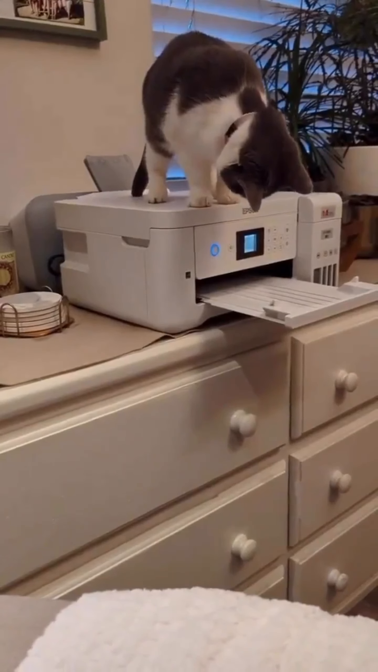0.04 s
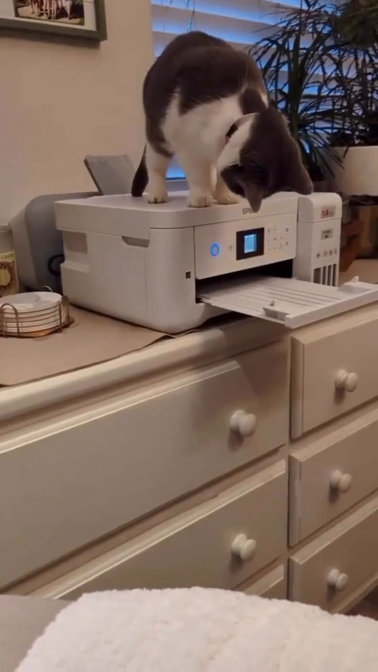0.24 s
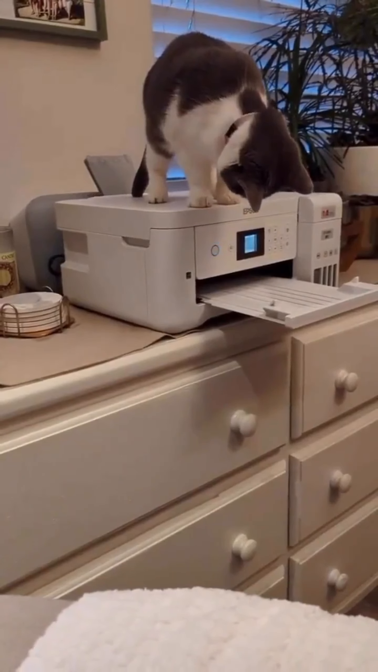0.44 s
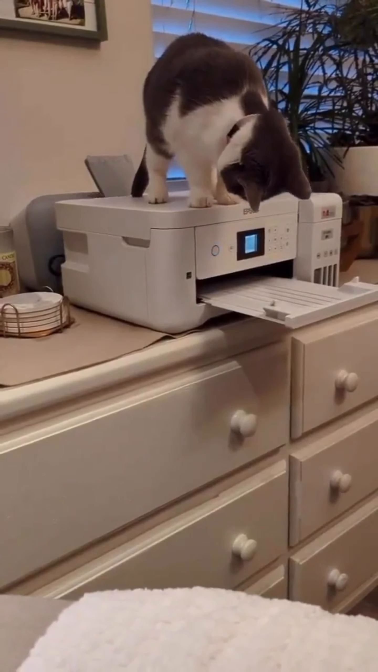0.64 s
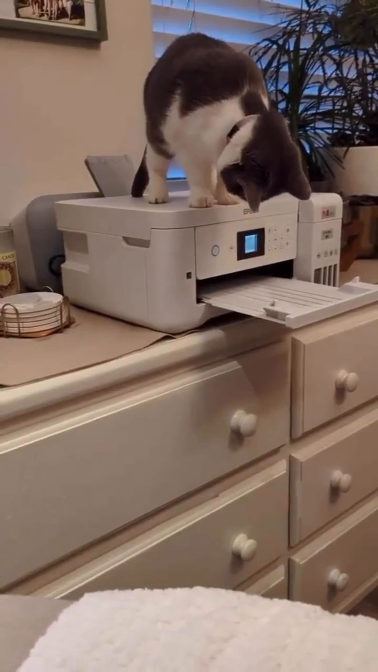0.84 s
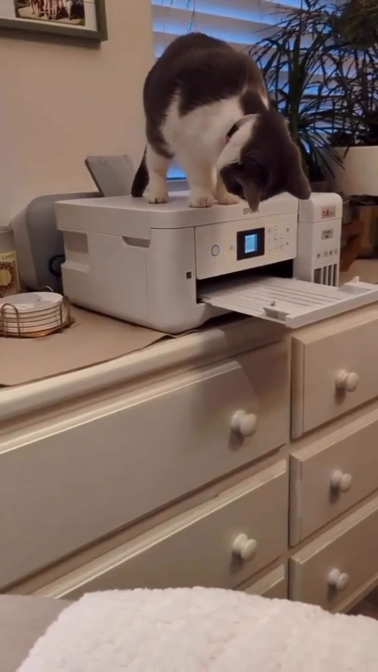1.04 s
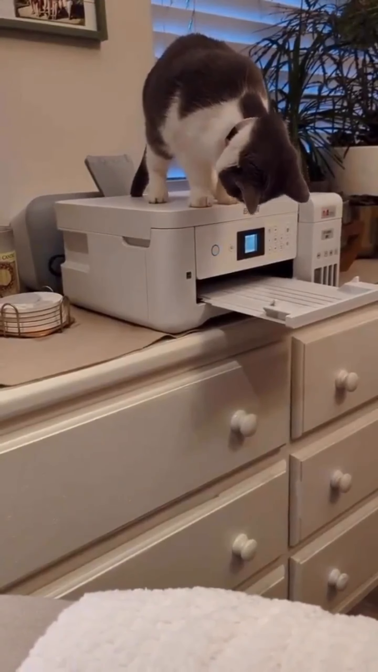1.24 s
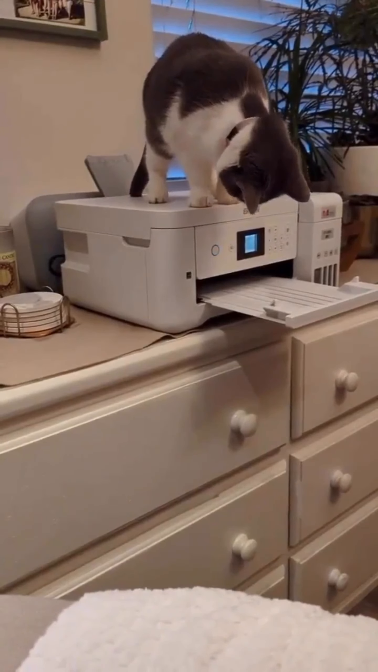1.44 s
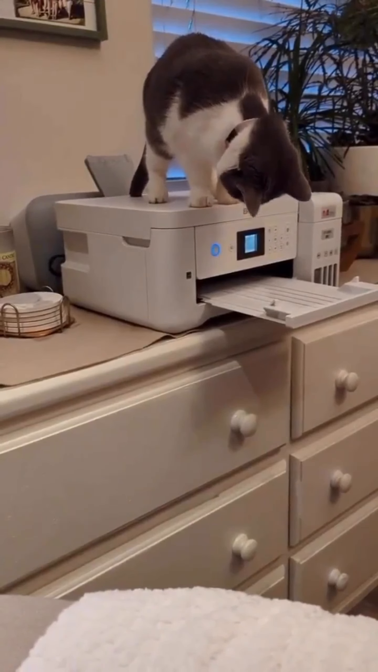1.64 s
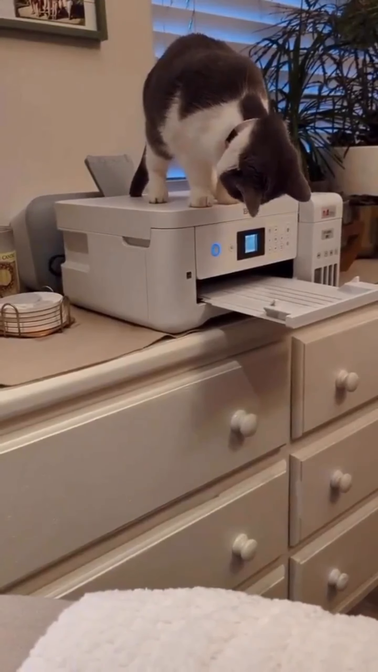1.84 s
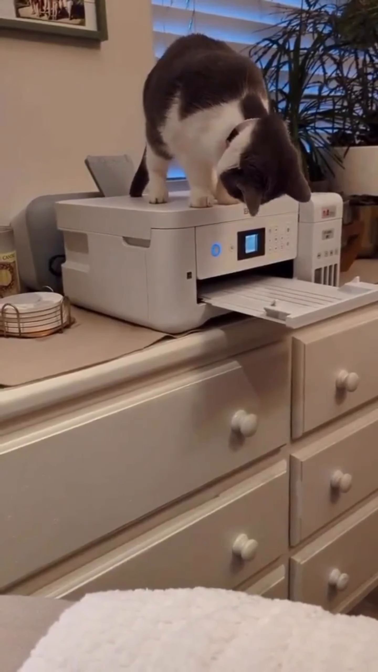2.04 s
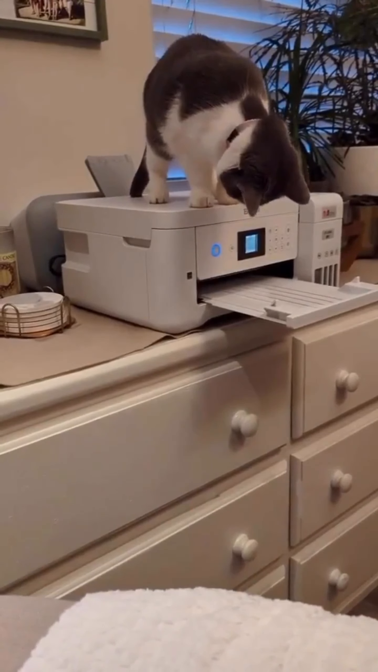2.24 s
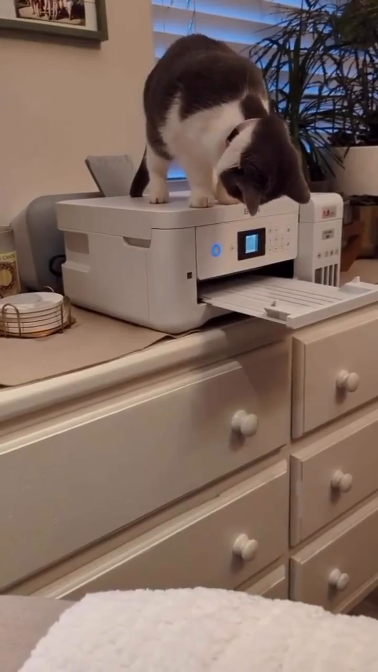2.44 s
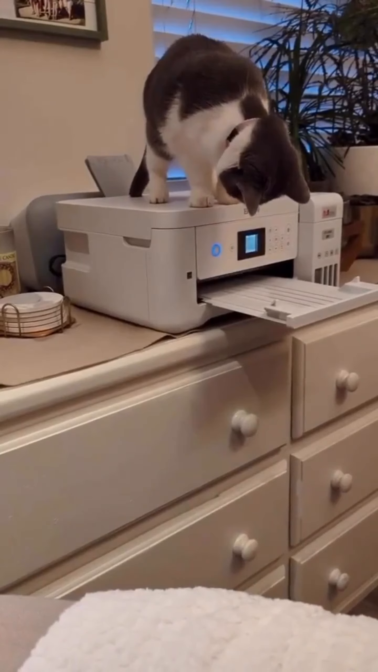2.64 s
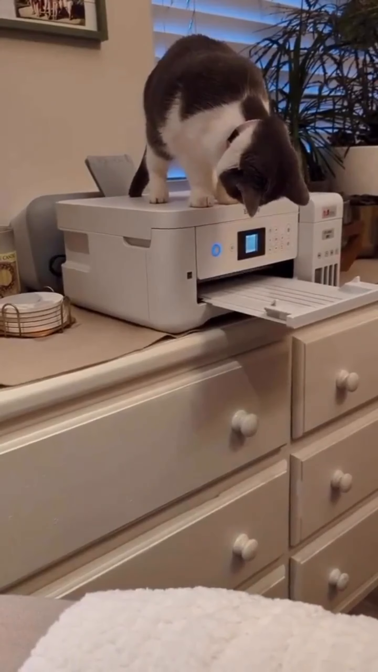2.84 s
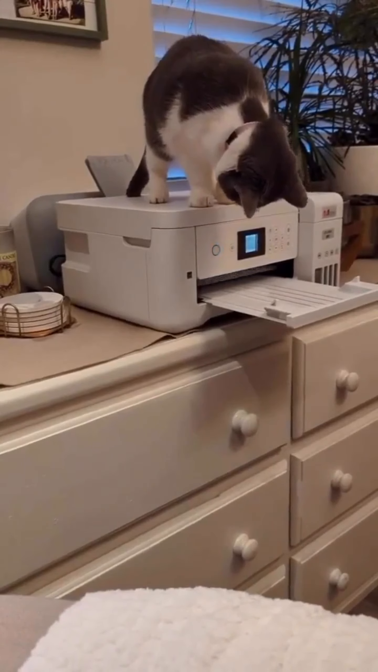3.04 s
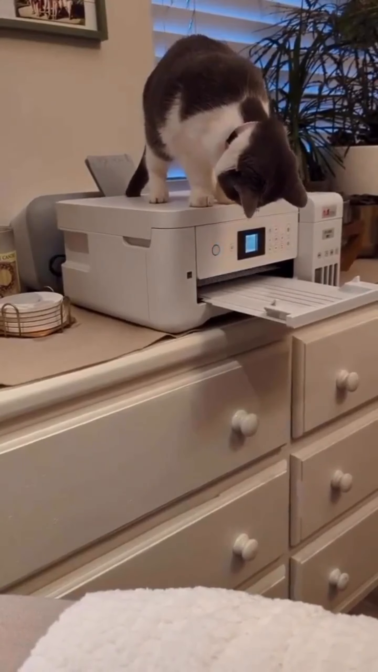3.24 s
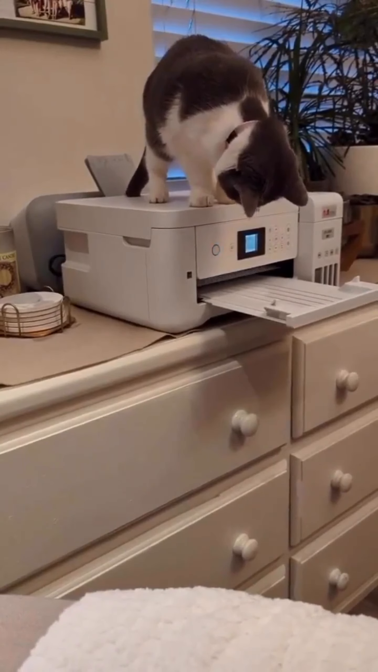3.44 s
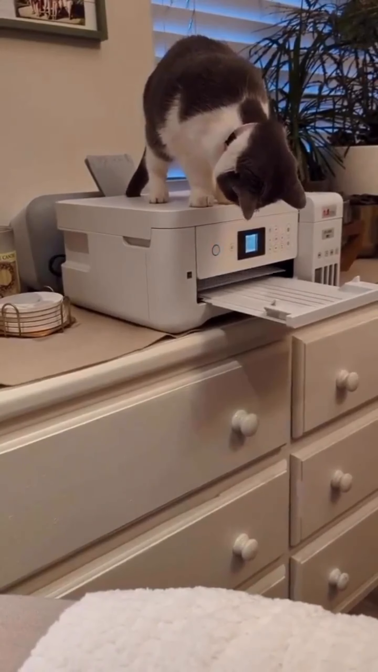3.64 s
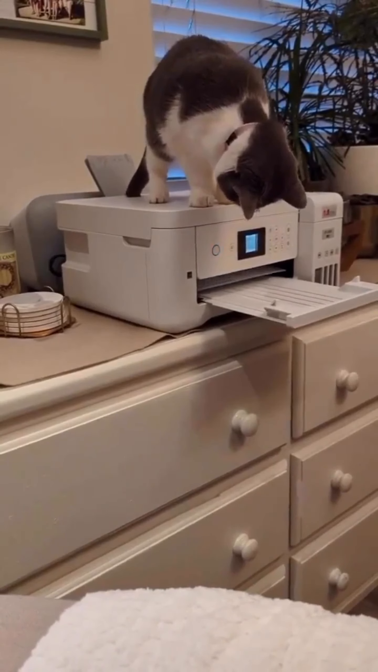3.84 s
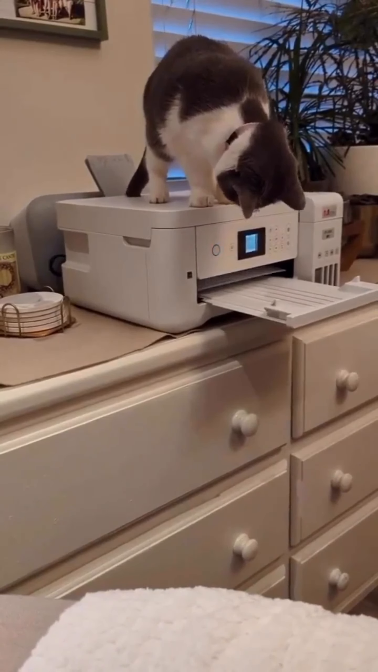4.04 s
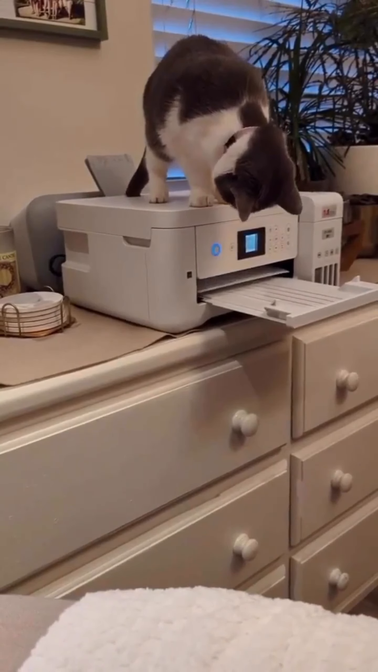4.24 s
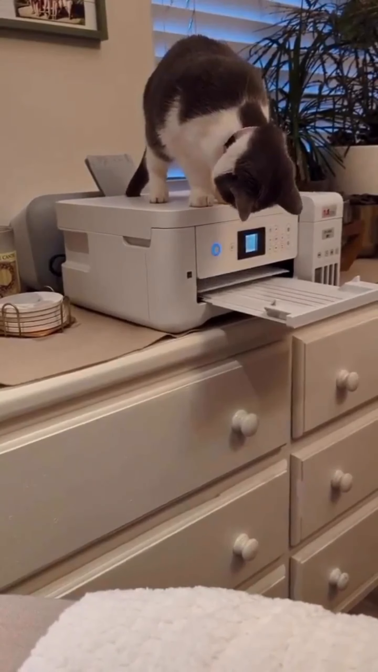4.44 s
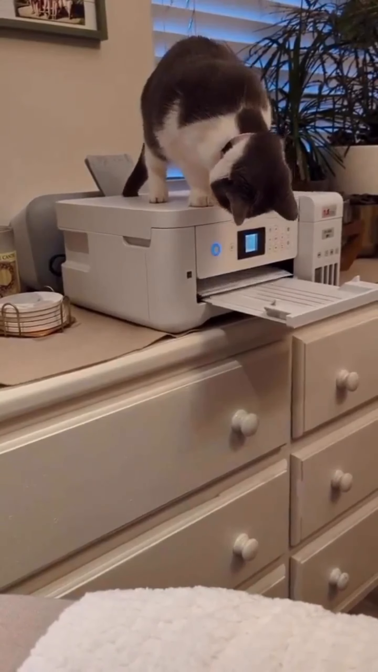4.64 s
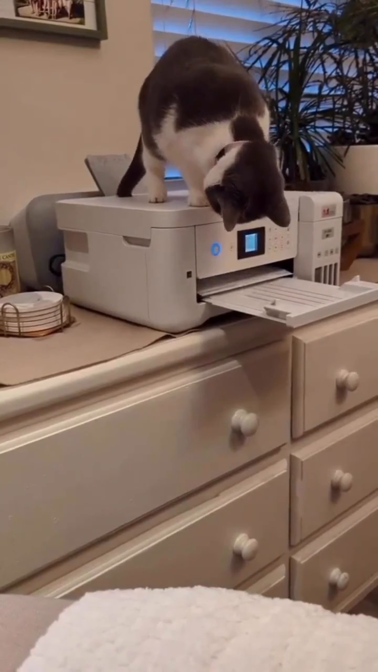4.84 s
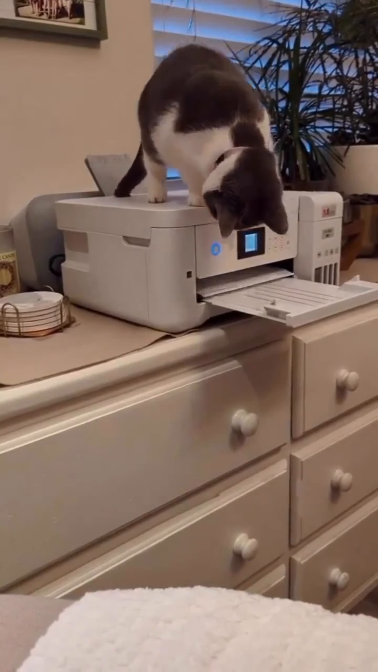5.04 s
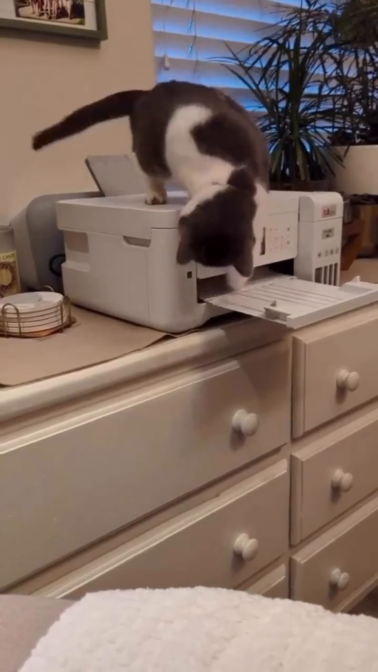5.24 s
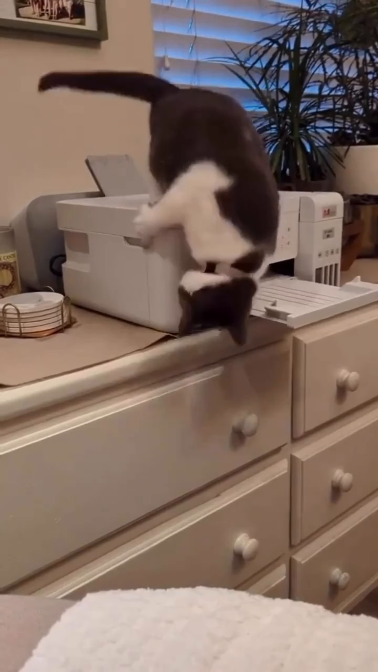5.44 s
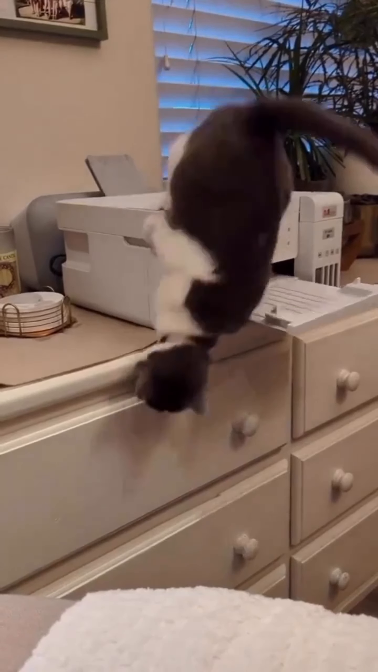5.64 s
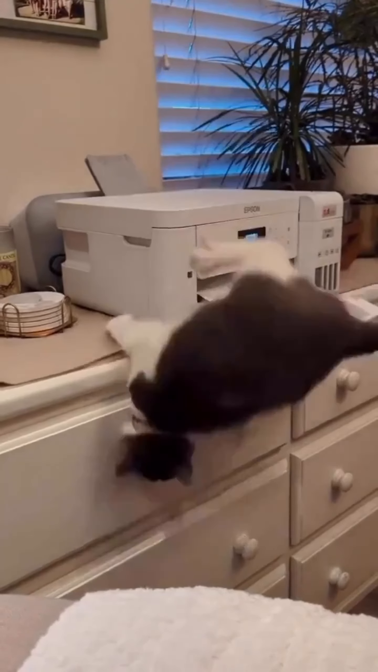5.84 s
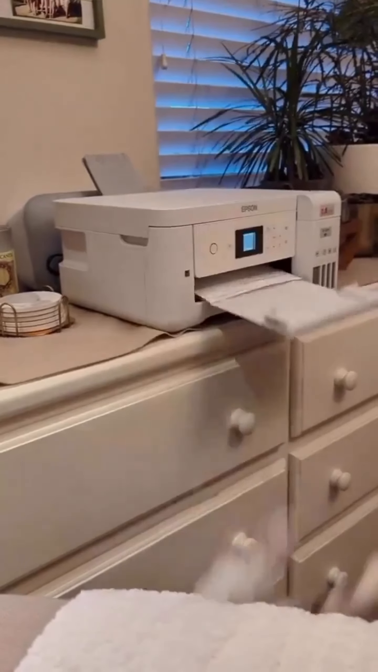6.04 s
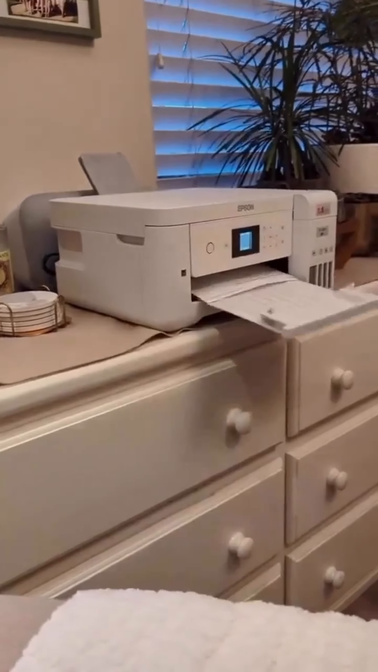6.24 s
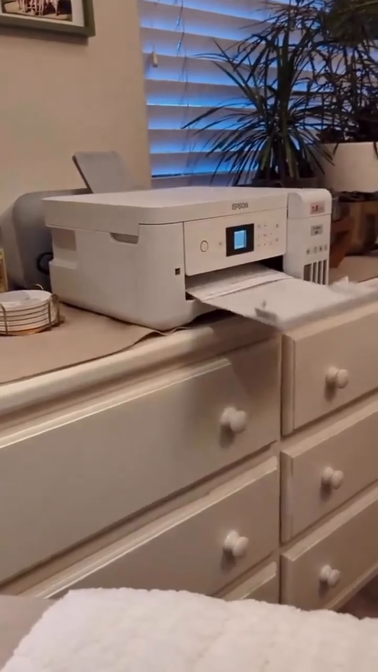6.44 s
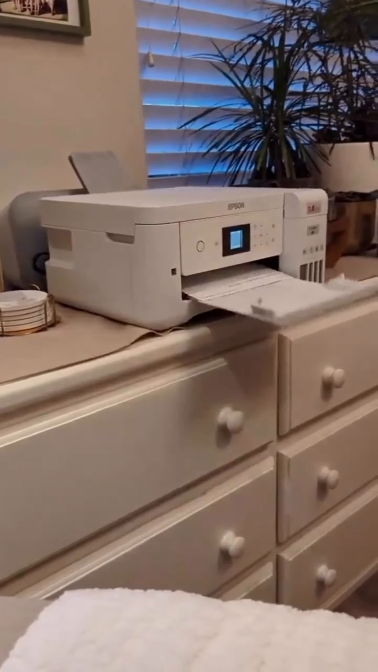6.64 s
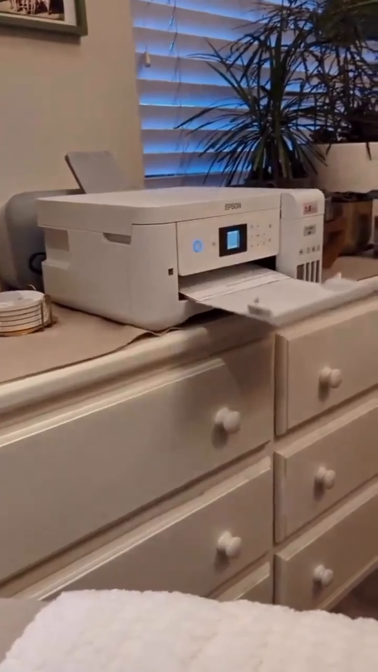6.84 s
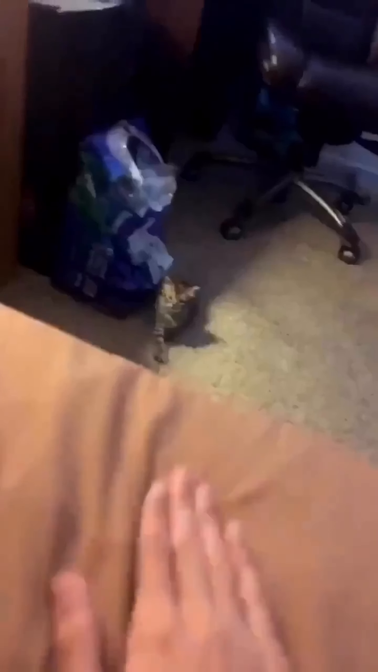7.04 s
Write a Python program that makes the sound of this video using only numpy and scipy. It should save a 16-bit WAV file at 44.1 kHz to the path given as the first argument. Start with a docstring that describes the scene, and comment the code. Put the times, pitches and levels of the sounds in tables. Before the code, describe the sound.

In a small furnished room, an inkjet printer on a dresser runs quietly: soft carriage hiss, low hum and a short gear burst about twice a second. After five seconds a cat's claws scrape and snap on the hollow plastic, its paws knocking and thumping. It drops to the floor with dull thuds while the loose tray clatters about ten times a second, gradually weakening, then everything stops abruptly. Close, central microphone.

```python
"""Inkjet printer on a dresser: carriage grains hiss on the rail over a low hum; gear grains burst twice a second.
At 5 s a cat on it scrambles down: stick-slip noise and claw snaps in panel resonances, paws as damped sines.
A sheet rustles as filtered grains; from 5.8 s low damped sines thump in dresser and floor.
Meanwhile the released tray bounces ten times a second, noise bursts in its resonances, until the sound cuts off."""
import sys
import numpy as np
from scipy import signal
from scipy.fft import rfft, irfft, next_fast_len
from scipy.io import wavfile
from scipy.ndimage import map_coordinates

SR = 44100
rng = np.random.default_rng(int(sys.argv[2]) if len(sys.argv) > 2 else 0)


def store_pcm(level_fs):
    """Save levels as 16-bit WAV."""
    pcm = np.round(np.clip(level_fs, -1, 1) * 32767).astype(np.int16)
    wavfile.write(sys.argv[1], SR, np.atleast_2d(pcm).T)


N = 313242

# Low hum near 65 Hz, pitch and level wandering: start_s, pitch_hz, level_db
LOW_HUM = [(0, 63, -40), (.3, 64.2, -63), (.65, 68.7, -50), (.95, 65, -47.5), (1.4, 68.9, -52),
           (1.8, 65.7, -52.5), (2.3, 66, -69), (2.55, 67.6, -53), (2.9, 62, -54), (3.35, 64, -56),
           (3.65, 69.9, -45), (3.9, 62, -57), (4.4, 66, -53), (4.68, 59.7, -47), (4.95, 60, -64)]
# Faint wavering tones: pitch_hz, level_db
FAINT_TONES = [(150, -66.5), (241, -62), (300, -65.5)]
# Dresser rumble spectrum: freq_hz, relative_db_per_hz
DRESSER_SPECTRUM = [(15, -49), (25, -24.5), (42, -2), (60, 2.5), (88, 0), (114, -13), (145, -11.5),
                    (200, -15), (240, -15.5), (270, -17), (307, -13), (379, -24.5), (500, -18),
                    (650, -44.5), (1100, -120)]

# Paper advances between passes: start_s, length_s, gear_db, case_db, cover_db, roller_db, next_pass_rail_db
FEEDS = [(-.055, 0.079, -59, -43, -49, -51, -66), (0.548, 0.079, -44, -49.5, -41.5, -41.5, -67),
         (0.956, 0.076, -47.5, -52, -47.5, -51.5, -65.5), (1.461, 0.077, -50.5, -48, -50.5, -51.5, -65),
         (1.974, .068, -50, -45.5, -46, -55.5, -64), (2.447, 0.073, -50, -47.5, -50, -63, -64),
         (2.888, 0.081, -43.5, -45.5, -42.5, -50.5, -64.5), (3.393, 0.078, -48, -46, -53, -53, -65),
         (3.892, 0.08, -50, -48, -49.5, -55, -65.5), (4.392, 0.073, -49, -46.5, -45.5, -50, -64.5),
         (4.87, 0.07, -48.5, -45, -49.5, -51, -58.5)]
# Soft knocks inside the mechanism: start_s, level_db
INNER_KNOCKS = [(0.273, -54), (1.264, -55), (1.292, -52), (1.773, -54), (1.799, -55), (2.21, -56),
                (2.264, -49.5), (2.74, -52), (3.199, -56), (3.697, -52)]
# Carriage rail spectrum: freq_hz, relative_db_per_hz
RAIL_SPECTRUM = [(240, -29), (400, -10), (686, -6.5), (973, -8.5), (1380, -13), (1790, -11), (1990, -18),
                 (2170, -14), (2540, -18.5), (3940, -21.5), (13000, -45)]
# Gear train spectrum: freq_hz, relative_db_per_hz
GEAR_SPECTRUM = [(76, -27.5), (130, -9), (180, 0.5), (232, -10.5), (361, -1.5), (413, -8), (780, -3.5),
                 (1290, -13.5), (1690, -18), (1970, -13), (5360, -31), (7580, -40.5), (13000, -35.5)]
# Moving sheet spectrum: freq_hz, relative_db_per_hz
PAPER_SPECTRUM = [(1000, 0.5), (2500, 2.5), (5000, -1), (7500, -13), (13000, -15)]
# Hollow case resonances: freq_hz, width_hz, relative_db
CASE_MODES = [(169, 14, 5.5), (247, 23, -5), (310.7, 9, -5), (350, 20, -4)]
# Plastic cover resonances: freq_hz, width_hz, relative_db
COVER_MODES = [(513, 34, -4.5), (602, 20, 5), (782, 34, 1.5), (877, 50, -4), (971.5, 28, -1),
               (1077, 62, -7), (1610, 150, -8.5)]
# Feed roller resonances: freq_hz, width_hz, relative_db
ROLLER_MODES = [(1573, 120, -1.5), (1716, 85, 1.5), (2150, 230, -11), (5365, 110, -17.5)]
REST_S, REST_WIDTH_S, REST_DB = 0.814, 0.057, -2  # brief carriage rest in one pass
TURN_DB, COAST_AT = 2, 0.56  # rail swing, +/-; share of the pass where it is quietest
SHAKE_DB, SHAKE_AT = 1.5, 0.69  # shaking swing, +/-; share of the pass where it is strongest
RUN_OUT_S = .012  # gear train lag
HISS_DB, HISS_DB_PER_GEAR_DB = -7, 0.82  # sheet relative to gears; its gain per dB of harder advance

# Paws skidding on plastic: start_s, held_s, scrape_db, panel_db, case_rumble_db, rasp_pitch_hz, rasp_db
SKIDS = [(4.973, 0.03, -49, -49.5, -44, 4310, -52), (5.077, 0.044, -45.5, -54, -51.5, 3690, -55),
         (5.195, 0.12, -43, -43.5, -43, 2920, -55), (5.345, 0.069, -42.5, -44.5, -44, 3000, -54),
         (5.51, 0.14, -42.5, -43.5, -37, 2300, -54), (5.743, 0.11, -49, -45, -38, 2300, -47)]
# Claws catching on the case: start_s, scratch_db, snap_db
CLAWS = [(4.979, -20.5, -23), (5.01, -25, -32.5), (5.088, -34, -39.5), (5.113, -37.5, -23),
         (5.183, -22, -26), (5.207, -28.5, -29.5), (5.222, -27, -30), (5.247, -29, -30),
         (5.290, -30, -25.5), (5.35, -29.5, -30.5), (5.37, -21.5, -25.5), (5.403, -23, -27.5),
         (5.499, -23.5, -15.5), (5.547, -26, -30.5), (5.645, -29.5, -34), (5.732, -18.5, -28),
         (5.753, -19.5, -29)]
# Claw scrape spectrum: freq_hz, relative_db_per_hz
SCRAPE_SPECTRUM = [(240, -22.5), (400, -11), (505, -3.5), (666, -11.5), (959, -0.5), (1260, -8.5),
                   (1740, 2.5), (1930, -1.5), (4110, -7), (6950, -17.5), (13000, -20)]
# Snap spectrum, claws and tray: freq_hz, relative_db_per_hz
SNAP_SPECTRUM = [(1000, -6), (2200, 0), (4500, 3.5), (7000, -3), (9000, -8), (13000, -9)]
# Case rumble spectrum: freq_hz, relative_db_per_hz
RUMBLE_SPECTRUM = [(100, -15), (165, 3), (240, -3.5), (305, 3), (390, -8.5), (480, -6.5), (800, -8.5),
                   (1500, -33)]
# Scratched front panel resonances: freq_hz, width_hz, relative_db
PANEL_MODES = [(530, 100, -3.5), (800, 70, -3), (1020, 120, -3), (1650, 140, 1), (2270, 220, -4.5),
               (2980, 450, -6), (4000, 180, -7), (4660, 330, -12.5), (6070, 550, -10)]
SKID_ATTACK_S, SKID_T60_S = .0081, 0.25
CATCH_DB = -12.5  # friction burst relative to a claw's peak
RASP_GLIDE_PER_S = 2.5  # share by which the rasp rises per second, for 0.1 s
SLIP_RATE_HZ, SLIP_SCATTER, SLIP_DECAY_S, SLIP_SHARE = 230, .5, .0024, .6  # nominal rate; share of the scrape

# Paws pushing off the case: start_s, thump_db, thump_pitch_hz, panel_knock_db
PUSHES = [(5.1, -42, 290, -38), (5.16, -33, 260, -52), (5.206, -30.5, 250, -47), (5.225, -32.5, 235, -46),
          (5.261, -42, 240, -31), (5.292, -42, 240, -34.5), (5.35, -30, 270, -35.5),
          (5.505, -29.5, 185, -43.5), (5.531, -23.5, 185, -52), (5.545, -24.5, 215, -18),
          (5.572, -25, 225, -29.5), (5.629, -32, 200, -36), (5.645, -40, 200, -32),
          (5.699, -28, 150, -48.5), (5.756, -23.5, 165, -27.5), (5.81, -23, 240, -26.5)]
# Case ringing under a paw: multiple_of_thump_pitch, relative_db, t60_s
PUSH_MODES = [(1, -0.5, .15), (1.42, -3, .11), (2.0, -6, .09)]
# Front panel ringing under a paw: freq_hz, relative_db, t60_s
KNOCK_MODES = [(780, -9, .08), (909.4, -1, .085), (1656, -7.5, .055), (2235, -15.5, .055)]
# Weight thumping dresser and floor: start_s, level_db, pitch_hz
THUDS = [(5.805, -30, 83.3), (5.918, -23.5, 99), (5.962, -16.5, 65.4), (6.08, -23, 64), (6.249, -24.5, 119),
         (6.264, -11.5, 71.5), (6.362, -23.5, 68)]
# Room boom spectrum: freq_hz, relative_db_per_hz
BOOM_SPECTRUM = [(15, -51.5), (25, -25), (40, -4.5), (65, 1.5), (89, 1), (114, -20.5), (141, -13.5),
                 (200, -22), (236, -12.5), (267, -17), (307, -11), (379, -25), (500, -17), (650, -48),
                 (1100, -120)]
# Paws brushing the floor, spectrum: freq_hz, relative_db_per_hz
BRUSH_SPECTRUM = [(200, -12), (450, -0.5), (1200, -4), (2200, -15.5), (6000, -36.5)]
KNOCK_DETUNE = .008  # each paw loads the panel differently
THUD_T60_S, BOOM_DB = 0.19, -14  # boom relative to its thump
LANDING_S, LANDING_DB, LANDING_ATTACK_S, LANDING_T60_S = 6.235, -24, 0.0122, 0.22

# Sheet rustling on the tray: start_s, length_s, level_db
RUSTLES = [(5.2, 0.16, -50.5), (5.506, 0.13, -53), (5.751, 0.022, -48), (6.091, 0.083, -42.5)]
# Rustle spectrum: freq_hz, relative_db_per_hz
RUSTLE_SPECTRUM = [(3000, -34), (8500, 0), (11000, 4), (12400, 6.5), (13200, -8.5)]

# Tray bounces: start_s, clack_db, snap_db, chatter_db, lip_db, edge_pitch_hz, edge_db
BOUNCES = [(5.806, -16, -21.5, -25.5, -37, 4600, -21.5), (5.897, -20, -25.5, -26.5, -44, 4430, -26.5),
           (5.990, -21, -25, -31, -38, 2740, -28.5), (6.085, -22.5, -27, -27, -40.5, 2280, -32),
           (6.1795, -22, -34.5, -30, -39.5, 3750, -28), (6.277, -27.5, -32.5, -30.5, -36.5, 3420, -27.5),
           (6.373, -25, -34.5, -35, -37, 4000, -31), (6.472, -26.5, -35.5, -37.5, -39, 4180, -29),
           (6.565, -28.5, -32.5, -34.5, -40.5, 2427, -33), (6.668, -27, -40, -36, -41.5, 3400, -33.5)]
# Tray clack spectrum: freq_hz, relative_db_per_hz
CLACK_SPECTRUM = [(76, -25.5), (130, -13.5), (161, 4), (265, -13.5), (309, 1), (390, -22), (438, -7.5),
                  (811, -9.5), (946, -8), (1290, -16.5), (1690, -6), (1900, -9.5), (2300, -12), (3180, -15),
                  (13000, -34.5)]
# Tray resonances: freq_hz, width_hz, relative_db
TRAY_MODES = [(162.3, 10, 8.5), (303, 6.8, 5), (344.4, 15, 9), (483, 30, 0), (724, 30, 2), (930, 36, 1.5),
              (1482, 35, 0.5), (1660, 43, -5.5), (2110, 40, -0.5), (2317, 40, -1.5), (2470, 25, 1),
              (2920, 22, -2), (3150, 61, -1.5), (3850, 50, -5.5), (3970, 50, -5), (4440, 110, -9),
              (5230, 100, -9.5), (6430, 70, -9.5)]
# Thin front lip resonances: freq_hz, width_hz, relative_db
LIP_MODES = [(2290, 50, -4.5), (2780, 90, 1), (3106, 130, 0.5), (3460, 130, 1), (3980, 70, -6),
             (4280, 110, -8)]
LEAD_S, LEAD_GROWS_S, LEAD_DB = .003, 0.00081, -3  # early corner: first lead, growth per bounce, level
SNAP_T60_S, LIP_T60_S = 0.041, .33
EDGE_WIDTH_HZ, EDGE_T60_S = 700, 0.045
RATTLE_RATE_HZ, RATTLE_DB = 90, -11  # loose parts; level relative to chatter

# Room decay: freq_hz, t60_s
ROOM = [(150, 0.53), (1000, 0.41), (4000, 0.32), (12000, 0.33)]
# Stereo side level: freq_hz, side_db
WIDTH = [(2800, -60), (4200, -14), (6000, -8), (13000, -8)]
CUT_S, TOP_HZ = 6.71, 13250


def amp(db):
    """Decibels to gain."""
    return 10 ** (np.asarray(db) / 20)


def unit(x):
    """Scale to rms 1."""
    return x / np.sqrt(np.mean(x ** 2) + 1e-20)


def clock():
    """Time of every sample, in seconds."""
    return np.arange(N) / SR


def along(points, hz):
    """(Hz, value) points read on a log axis."""
    f, v = np.transpose(points)
    return np.interp(np.log(hz + 1), np.log(f + 1), v)


def wobble(rate_hz):
    """Smooth random curve with rate_hz knots a second."""
    knots = rng.standard_normal(int(N * rate_hz / SR) + 4)
    return map_coordinates(knots, [clock() * rate_hz])


def filtered(x, response):
    """x times a complex response of frequency."""
    m = 2 * next_fast_len(N // 2 + SR // 4)
    return irfft(rfft(x, m) * response(np.fft.rfftfreq(m, 1 / SR)), m)[..., :N]


def coloured(x, spectrum):
    """x through a causal, minimum-phase filter of unit power with the given spectrum."""
    def response(hz):
        magnitude = unit(amp(along(spectrum, hz)))
        cepstrum = irfft(np.log(magnitude + 1e-6))
        half = len(cepstrum) // 2
        fold = np.r_[1, np.full(half - 1, 2), 1, np.zeros(half - 1)]
        return np.exp(rfft(cepstrum * fold))
    return filtered(x, response)


def peak(x, hz, width_hz):
    """x through one resonance."""
    return signal.lfilter(*signal.iirpeak(hz, hz / width_hz, fs=SR), x)


def resonate(x, modes, vary_db):
    """x through resonances of unit power; each strength drifts as the contact point moves."""
    out, power = np.zeros(N), 0
    for k, (hz, width_hz, db) in enumerate(modes):
        mode = (-1) ** k * peak(x, hz, width_hz)
        out += amp(db) * unit(amp(vary_db * wobble(12))) * mode
        power += amp(db) ** 2 * np.pi * width_hz / SR
    return out / np.sqrt(power)


def grains(rate_hz, spread_db):
    """Tiny random contacts of uneven size, rate_hz a second, rms 1."""
    hit = rng.random(N) < rate_hz / SR
    sign = np.sign(rng.standard_normal(N))
    size = amp(spread_db * np.clip(rng.standard_normal(N), -2, 2))
    return unit(hit * sign * size)


def decay(s, t60, attack):
    """Envelope that starts at s, swells quickly and dies away; all in seconds."""
    envelope = np.zeros(N)
    live = np.arange(max(int(s * SR), 0), min(int((s + 2 * t60) * SR), N))
    t = np.maximum(live / SR - s, 0)
    envelope[live] = (1 - np.exp(-t / attack)) * amp(-60 * t / t60)
    return envelope


def hump(s, length, shape):
    """shape(u) of the share u of a movement done so far."""
    return shape(np.clip((clock() - s) / length, 0, 1))


def smear(x, decay_s):
    """Each impulse dies away exponentially."""
    return signal.lfilter([1], [1, -np.exp(-1 / (decay_s * SR))], x)


def room(x, wet_db):
    """x plus the small room's answer, each frequency dying at its own speed."""
    hz, t, z = signal.stft(rng.standard_normal(SR // 2), SR, nperseg=256)
    fading = amp(-60 * t / along(ROOM, hz)[:, None])
    tail = signal.istft(z * fading, SR, nperseg=256)[1]
    tail = np.pad(tail / np.linalg.norm(tail), (SR // 300, 0))
    return x + amp(wet_db) * signal.fftconvolve(x, tail)[:N]


def waver_tone(hz, waver):
    """Sine whose pitch wavers at random, by the given share."""
    return np.sin(2 * np.pi * np.cumsum(hz * (1 + waver * wobble(9))) / SR)


def low_hum():
    """Low hum near 65 Hz and faint tones, pitch and level wavering at random, over the dresser's dull rumble."""
    s, pitch_hz, level_db = np.transpose(LOW_HUM)
    pitch_hz = np.interp(clock(), s, pitch_hz)
    level_db = np.interp(clock(), s, level_db)
    hum = amp(level_db + 2 * wobble(7)) * waver_tone(pitch_hz, waver=.015)
    faint = sum(amp(db + 2.2 * wobble(5.8)) * waver_tone(hz, waver=.01) for hz, db in FAINT_TONES)
    rumble = amp(-52.0) * coloured(rng.standard_normal(N), DRESSER_SPECTRUM)
    return hum + faint + rumble


def carriage():
    """Head rubs its rail hardest near the turns; drive shakes case and cover, which muffle inner knocks."""
    passes = np.interp(clock(), [s for s, *_ in FEEDS], np.arange(len(FEEDS)))
    rail_db = np.array([db for *_, db in FEEDS])[passes.astype(int)]
    turn_db = -TURN_DB * np.cos(2 * np.pi * (passes - COAST_AT))
    shake_db = SHAKE_DB * np.cos(2 * np.pi * (passes - SHAKE_AT))
    rest_db = REST_DB * np.exp(-((clock() - REST_S) / REST_WIDTH_S) ** 2)
    flutter_db = 0.65 * wobble(11) + 0.9 * wobble(30)
    rubbing = grains(5000, spread_db=2)
    slide = amp(rail_db + turn_db + rest_db + flutter_db) * coloured(rubbing, RAIL_SPECTRUM)
    knock_level = sum(amp(db) * decay(s, t60=.06, attack=.0007) for s, db in INNER_KNOCKS)
    knocks = coloured(knock_level * rubbing, GEAR_SPECTRUM)
    case = amp(shake_db - 59.5) * resonate(rng.standard_normal(N), CASE_MODES, vary_db=3.5)
    cover = amp(shake_db + rest_db - 64.5) * resonate(grains(300, spread_db=1), COVER_MODES, vary_db=3.5)
    muffle = signal.butter(2, 3200, fs=SR, output="sos")
    return room(slide, wet_db=-5.5) + signal.sosfilt(muffle, case + cover + knocks)


def run_out(push):
    """The gear train follows a push with a short lag."""
    keep = np.exp(-1 / (RUN_OUT_S * SR))
    return signal.lfilter([1 - keep], [1, -keep], push)


def paper_feed():
    """Gears chatter and whirr with speed, with a tick early in each advance; the moving sheet hisses."""
    gear, ticks, ring, knock, whirr, sheet = np.zeros((6, N))
    usual_db = np.mean([db for _, _, db, *_ in FEEDS])
    for s, length, gear_db, case_db, cover_db, roller_db, _ in FEEDS:
        speed = hump(s, length, lambda u: 4 * u * (1 - u))
        tick = decay(s + .013, t60=.04, attack=.002)
        gear += amp(gear_db) * speed ** 1.2
        ticks += amp(gear_db - 2.0) * tick
        ring += amp(cover_db) * speed ** 1.7
        knock += amp(case_db) * speed
        whirr += amp(roller_db) * speed ** 1.4
        sheet_db = usual_db + HISS_DB_PER_GEAR_DB * (gear_db - usual_db) + HISS_DB
        sheet += amp(sheet_db) * (speed + amp(-2.5) * tick)
    teeth = amp(2.2 * np.clip(wobble(260), -1.8, 1.8))  # uneven meshing
    gears = coloured((run_out(gear) + ticks) * unit(teeth * grains(1400, spread_db=-2)), GEAR_SPECTRUM)
    cover = resonate(ring * unit(teeth * grains(1200, spread_db=1.0)), COVER_MODES, vary_db=0.5)
    case = resonate(knock * grains(1400, spread_db=1), CASE_MODES, vary_db=1.5)
    rollers = resonate(whirr * grains(2000, spread_db=0.5), ROLLER_MODES, vary_db=3.0)
    hiss = coloured(sheet * unit(teeth * grains(3500, spread_db=1)), PAPER_SPECTRUM)
    return room(gears + cover + case + rollers + hiss, wet_db=-9)


def skid_shape(s, held):
    """A skid grips quickly, holds and runs out slowly."""
    t = np.maximum(clock() - s, 0)
    return (1 - np.exp(-t / SKID_ATTACK_S)) * amp(-60 * np.clip((t - held) / SKID_T60_S, 0, 2))


def rasp(s, hz):
    """Narrow band of friction noise that rises as the claw gathers speed."""
    pitch_hz = hz * (1 + RASP_GLIDE_PER_S * np.clip(clock() - s, 0, .1))
    band = signal.lfilter(*signal.butter(2, 120, fs=SR), rng.standard_normal(N))
    return unit(band * np.sin(2 * np.pi * np.cumsum(pitch_hz) / SR))


def stick_slip():
    """A claw holds and lets go unevenly; each slip is a short jerk of its own size."""
    gap_draw, size_draw = rng.standard_normal((2, int(2 * SLIP_RATE_HZ * N / SR)))
    at = (np.cumsum(np.exp(SLIP_SCATTER * gap_draw)) * SR / SLIP_RATE_HZ).astype(int)
    jerks = np.bincount(at, amp(3 * np.clip(size_draw, -1.5, 1.5)), N)[:N]
    return unit(1 - SLIP_SHARE + SLIP_SHARE * unit(smear(jerks, SLIP_DECAY_S)))


def scramble():
    """Claws snap and skid, waking shifting panel resonances; the hollow case rumbles."""
    scrape, press, weight, rasps = np.zeros((4, N))
    for s, held, scrape_db, panel_db, rumble_db, hz, rasp_db in SKIDS:
        shape = skid_shape(s, held)
        scrape += amp(scrape_db) * shape
        press += amp(panel_db) * shape
        weight += amp(rumble_db) * shape
        rasps += amp(rasp_db) * shape * rasp(s, hz)
    catches = sum(amp(db + CATCH_DB) * decay(s, t60=0.057, attack=0.0012) for s, db, _ in CLAWS)
    snaps = sum(amp(db + CATCH_DB) * decay(s, t60=0.023, attack=0.0004) for s, _, db in CLAWS)
    slips = stick_slip()
    scratch_force = (scrape * slips + catches) * grains(4000, spread_db=1.5)
    panel_force = (press * slips + amp(-4.5) * catches) * grains(4000, spread_db=1.5)
    scratch = coloured(scratch_force, SCRAPE_SPECTRUM)
    panel = resonate(panel_force, PANEL_MODES, vary_db=4)
    snap = coloured(snaps * grains(6600, spread_db=2), SNAP_SPECTRUM)
    rumble = weight * coloured(grains(900, spread_db=2.5), RUMBLE_SPECTRUM)
    return room(scratch + panel + slips * rasps + snap + rumble, wet_db=-2.5)


def damped_sine(s, hz, t60):
    """One mode struck at s."""
    return decay(s, t60, attack=0.002) * np.sin(2 * np.pi * hz * (clock() - s))


def strike(s, db, modes, tuning):
    """Modes struck together, each at a slightly random level."""
    out = np.zeros(N)
    for f, mode_db, t60 in modes:
        out += amp(db + mode_db + rng.normal(0, 1.3)) * damped_sine(s, f * tuning, t60)
    return out


def footfalls():
    """Paws ring case and panel, thump damped cycles out of dresser and floor, brush the floor on landing."""
    pushes, knocks = np.zeros((2, N))
    for s, thump_db, hz, knock_db in PUSHES:
        pushes += strike(s, thump_db, PUSH_MODES, hz)
        knocks += strike(s, knock_db, KNOCK_MODES, 1 + KNOCK_DETUNE * rng.uniform(-0.67, 1))
    thuds = sum(amp(db) * damped_sine(s, hz, THUD_T60_S) for s, db, hz in THUDS)
    weight = sum(amp(db + BOOM_DB) * decay(s, THUD_T60_S, attack=0.0021) for s, db, *_ in THUDS + PUSHES)
    boom = coloured(weight * rng.standard_normal(N), BOOM_SPECTRUM)
    landing = amp(LANDING_DB) * decay(LANDING_S, LANDING_T60_S, LANDING_ATTACK_S)
    brush = landing * coloured(grains(2500, spread_db=2), BRUSH_SPECTRUM)
    return pushes + knocks + thuds + room(boom + brush, wet_db=-3.0)


def rustle():
    """The printed sheet slips on the tray with a thin high hiss."""
    slip = sum(amp(db) * hump(s, length, lambda u: np.sin(np.pi * u)) for s, length, db in RUSTLES)
    return slip * coloured(grains(4000, spread_db=2), RUSTLE_SPECTRUM)


def tray():
    """Two corners slap their stops per bounce, the struck edge varying; plastic chatters, lip rings on."""
    slaps, snaps, chatter, buzz, edges = np.zeros((5, N))
    contact = grains(12000, spread_db=1)
    for k, (s, clack_db, snap_db, chatter_db, lip_db, edge_hz, edge_db) in enumerate(BOUNCES):
        early_s = s - LEAD_S - LEAD_GROWS_S * k
        for at, corner_db in (early_s, LEAD_DB), (s, 0):
            slaps += amp(clack_db + corner_db) * decay(at, t60=0.049, attack=0.0008)
            snaps += amp(snap_db + corner_db) * decay(at, SNAP_T60_S, attack=0.00061)
        chatter += amp(chatter_db) * decay(s, t60=0.35, attack=0.017)
        buzz += amp(lip_db) * decay(s, LIP_T60_S, attack=.002)
        edge = unit(peak(contact, edge_hz, EDGE_WIDTH_HZ))
        edges += amp(edge_db) * decay(s, EDGE_T60_S, attack=.0003) * edge

    def force():
        return slaps * grains(12000, spread_db=1.5) + chatter * grains(900, spread_db=3)

    crack = amp(-2.0) * coloured(force(), CLACK_SPECTRUM)
    ticks = unit(smear(np.abs(grains(RATTLE_RATE_HZ, spread_db=1.5)), .001))
    rattle = amp(RATTLE_DB) * chatter * ticks
    snap = coloured((snaps + rattle) * grains(9000, spread_db=3.5), SNAP_SPECTRUM)
    ring = amp(-4.5) * resonate(force(), TRAY_MODES, vary_db=3.5)
    lip = resonate(buzz * grains(1500, spread_db=2), LIP_MODES, vary_db=4)
    return room(crack + snap + edges + ring + lip, wet_db=-6)


def scene():
    """Everything comes from straight ahead; only the treble is diffuse."""
    mid = low_hum() + carriage() + paper_feed() + scramble() + footfalls() + rustle() + tray()
    side = filtered(mid * unit(wobble(700)), lambda hz: 1j * amp(along(WIDTH, hz)))
    return np.array([mid + side, mid - side])


def record(dry):
    """The microphone sheds deep bass; the sound stops abruptly; nothing passes the band limit."""
    low_cut_hz, fade_t60_s = 42, .045
    low_cut = signal.butter(3, low_cut_hz, "high", fs=SR, output="sos")
    microphone = signal.sosfilt(low_cut, dry)
    fade = amp(-60 * np.clip((clock() - CUT_S) / fade_t60_s, 0, 2))
    return filtered(microphone * fade, lambda hz: hz < TOP_HZ)


dry = scene()
out = record(dry)
store_pcm(out)
```